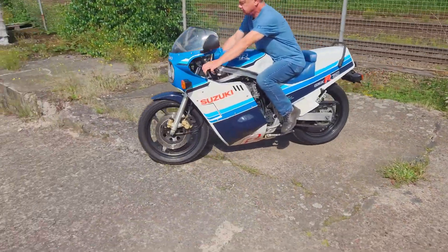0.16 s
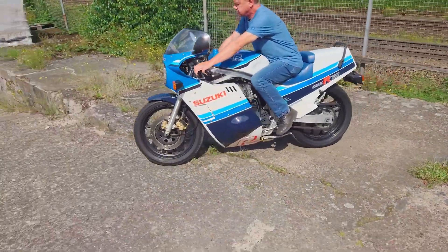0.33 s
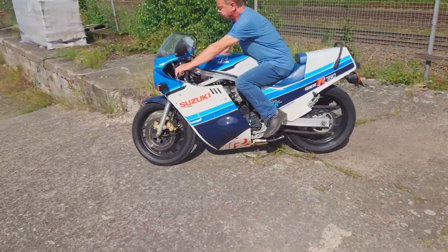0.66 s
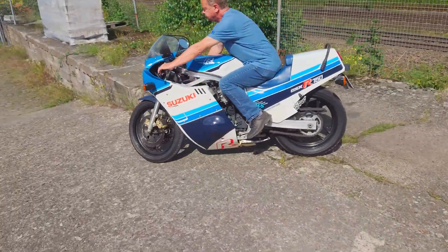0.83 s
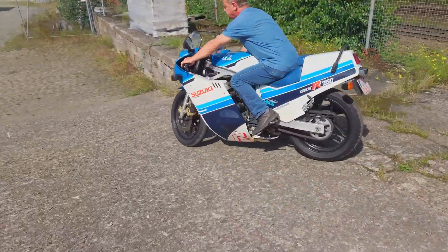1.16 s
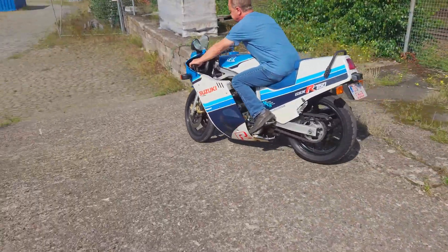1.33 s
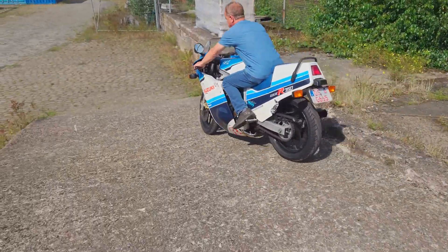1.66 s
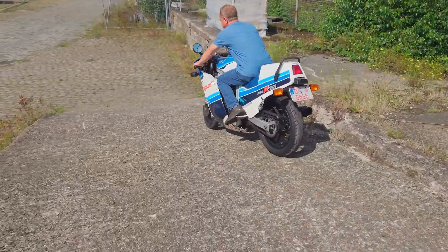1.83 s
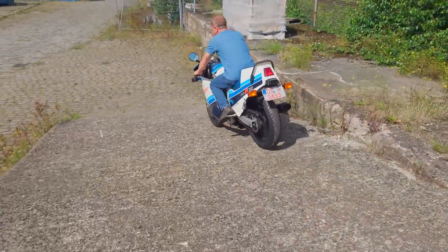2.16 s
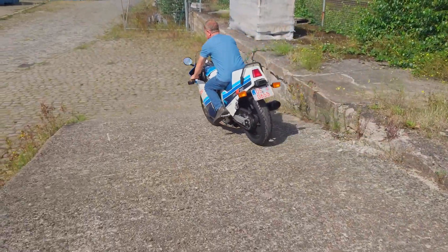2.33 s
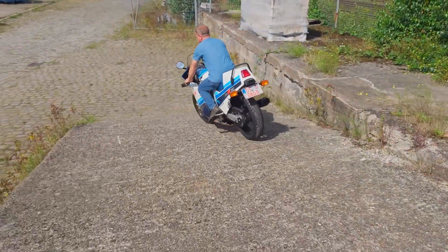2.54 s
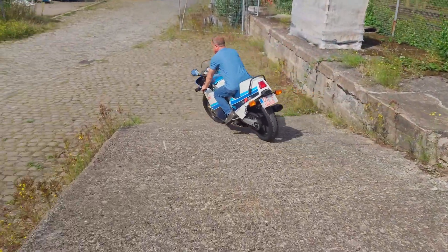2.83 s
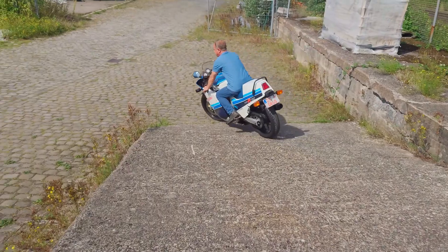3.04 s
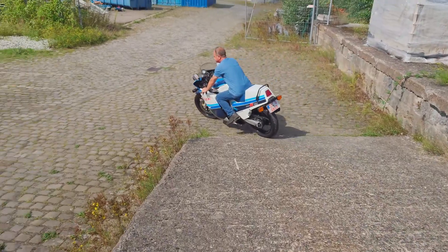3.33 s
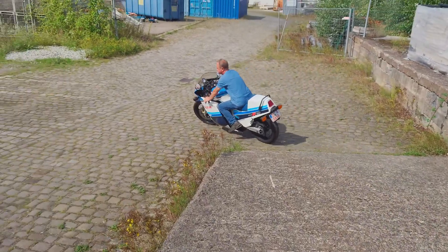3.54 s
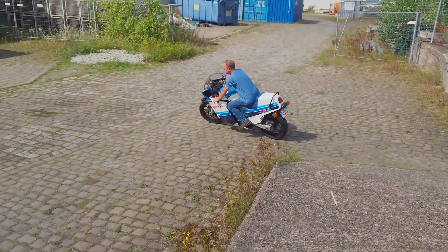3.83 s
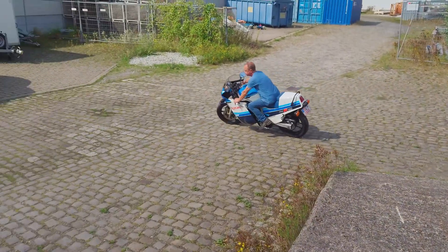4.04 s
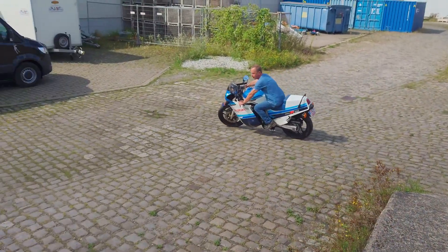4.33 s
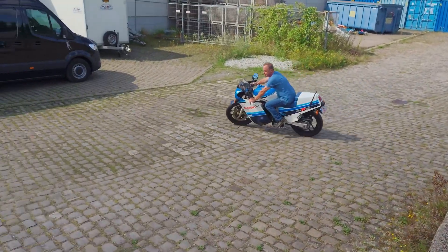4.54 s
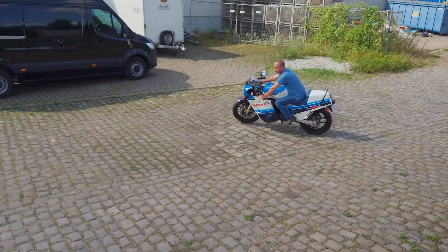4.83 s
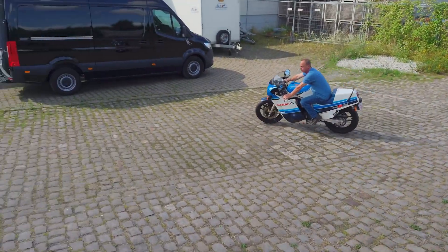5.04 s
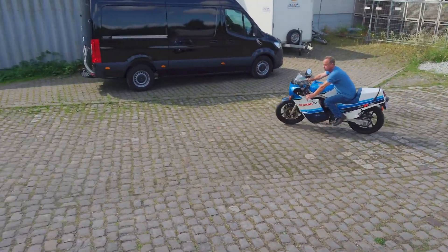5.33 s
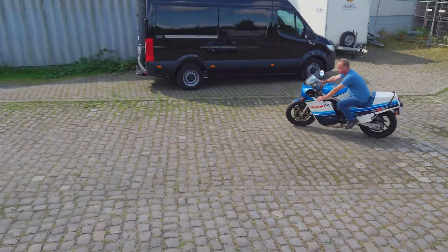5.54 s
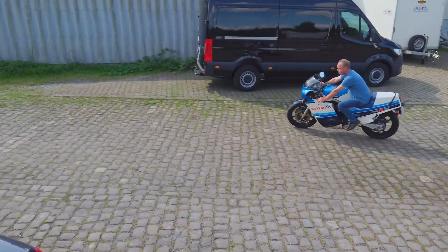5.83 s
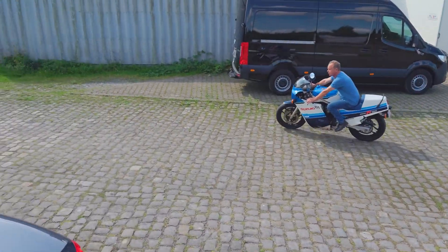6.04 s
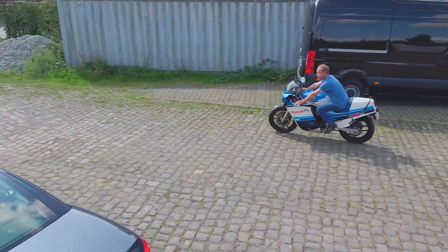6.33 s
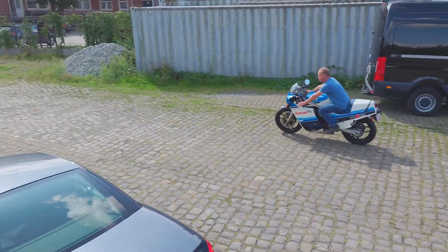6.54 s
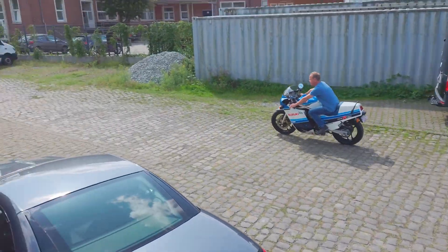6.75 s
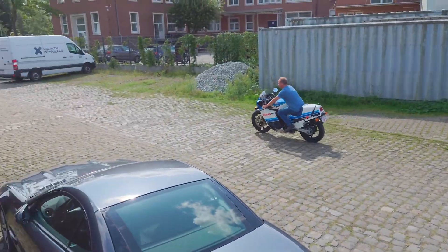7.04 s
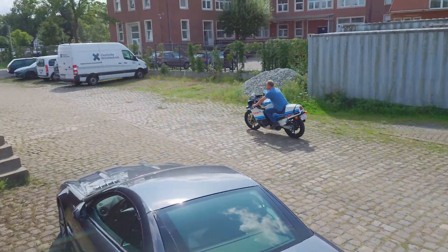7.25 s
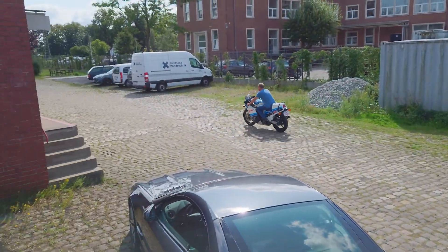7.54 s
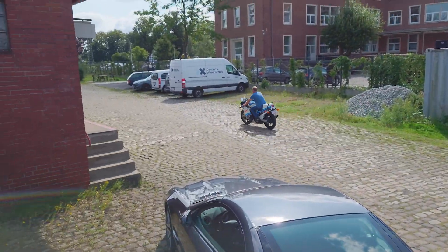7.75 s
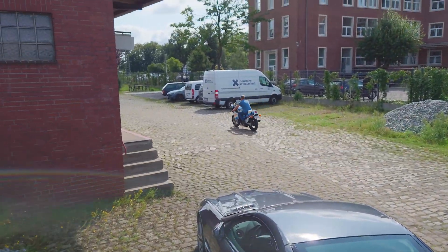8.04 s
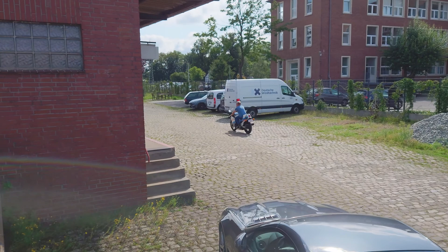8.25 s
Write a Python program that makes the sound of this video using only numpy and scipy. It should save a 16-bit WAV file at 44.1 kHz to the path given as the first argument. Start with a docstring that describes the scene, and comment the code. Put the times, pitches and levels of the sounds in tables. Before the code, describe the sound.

A nearby motorcycle opens with a barking exhaust and bright mechanical clatter, then falls to a soft loping idle with a brief brake hiss and light knocks over cobbles. Low wind thumps faintly. After a short blip the engine surges, booming and rasping with a thin beating whine, climbs again, then closes and drops. Natural stereo, outdoors, short wall reflections.

```python
"""A four-cylinder motorcycle in a cobbled yard: a blip close by, a loping idle as it coasts away, then two pulls.
From the start exhaust pulses ring the silencer and bark at the tailpipe, pulse-driven noise makes the clatter,
low noise the wind at two microphone ports, and decaying noise the walls' answer. Decaying rings and cracks knock
as the wheels cross joints; shaped noise gives a brief brake hiss at 1.5 s. At 5.8 s low noise swells with the
engine's push; from 6 s pulses rasp in the intake and a beating sine whines until the throttle shuts at 7.7 s."""
import sys
import numpy as np
from scipy import signal
from scipy.fft import rfft, irfft, next_fast_len
from scipy.io import wavfile
from scipy.ndimage import uniform_filter1d, map_coordinates

SR = 44100
rng = np.random.default_rng(int(sys.argv[2]) if len(sys.argv) > 2 else 0)


def pcm_store(signal):
    """Save signal as 16-bit PCM."""
    levels = np.round(np.clip(np.atleast_2d(signal), -1, 1) * 32767)
    wavfile.write(sys.argv[1], SR, levels.astype(np.int16).T)


def decibels_to_gain(level_db):
    """Convert a level in decibels to a linear amplitude gain (20 dB per decade)."""
    exponent = np.asarray(level_db, float) / 20
    return 10 ** exponent


N = 370440  # samples

# firing rate: t/s, f/Hz
FIRING_RATE = [(0, 64), (.31, 70.5), (.51, 66), (.83, 83.5), (1.22, 51.3), (1.35, 41.6), (1.5, 35.8),
               (2.08, 35.9), (2.85, 38), (3.16, 37.4), (3.53, 39.8), (3.79, 37.4), (4.3, 43), (4.56, 37.3),
               (4.91, 54.6), (5.13, 71), (5.42, 53.5), (5.85, 57), (6.08, 96), (6.33, 126), (6.53, 129),
               (6.78, 125), (6.91, 117), (7.46, 150), (7.69, 163), (7.85, 157), (8.05, 141), (8.15, 118.5),
               (8.28, 117.5), (8.4, 128)]
# throttle: t/s, opening/1 (-1 shut at speed, 0 idle, 1 open)
THROTTLE = [(0, .7), (.84, .7), (.92, -.6), (1.3, -.5), (1.5, 0), (2.9, 0), (3.5, .2), (4.6, .2),
            (4.95, .45), (5.8, .5), (6.15, 1), (7.7, 1), (7.715, -1), (8.08, -1), (8.17, .6), (8.4, .6)]
# firing pattern: throttle/1, cycle swing/1, crank-turn swing/1, chance scatter/dB, gas heat/1,
# bite/1 (power by which a strong firing barks more than its size)
FIRING_PATTERN = [(-1, .6, .12, 2.2, .3, -.7), (0, .5, .17, 1.2, 0, 1), (.2, .33, .18, 2.2, .1, .6),
                  (.5, .3, .12, .9, .45, 0), (.7, .3, .35, .7, .7, 0), (1, .06, .03, .4, 1, 0)]
# firings come early and late over each four-firing cycle: parts of a firing gap, radians behind the size swing
TIMING_SWING_GAPS, TIMING_LAG_RAD = .1, 1.7
# exhaust: t/s, silencer boom level/dB, tailpipe bark level/dB
EXHAUST_LEVELS = [(0, -14.5, -26.5), (.84, -15, -23.5), (.95, -18, -46), (1.2, -16, -34), (1.5, -18, -46),
                  (2.6, -18, -35), (3.1, -21.5, -35.5), (4.65, -22.5, -36.5), (4.91, -16.5, -31),
                  (5.1, -20.5, -30.5), (5.63, -19.5, -28), (6.07, -17.5, -24), (6.3, -12, -20.5),
                  (6.6, -10, -24), (6.9, -14, -17.5), (7.4, -16.5, -24), (7.56, -12.5, -16.5),
                  (7.7, -24.5, -16), (7.9, -23, -30.5), (8.15, -20, -28), (8.4, -19.5, -31)]
# boom drops out briefly: t/s, depth/dB, length/s
BOOM_DROPOUTS = [(1.05, 18, .05), (1.41, 7, .06), (5.49, 7, .1), (6.12, 13, .06), (7.47, 9, .07)]
# silencer can at idle: f/Hz, width/Hz, level/dB
SILENCER_IDLE = [(108, 32, 0)]
# silencer can with hot, fast gas: f/Hz, width/Hz, level/dB
SILENCER_HOT = [(120.5, 58, 0)]
# short second ring of the cool silencer: f/Hz, width/Hz, level/dB
COOL_THUMP = [(187, 67, -9.5)]
# bare pressure push below the ring: f/Hz, width/Hz, level/dB
PRESSURE_PUSH = [(55, 35, -16.5)]
# tailpipe resonances: f/Hz, width/Hz, level/dB
TAILPIPE = [(177.3, 61, 5.5), (312.7, 82, 2), (370, 25.4, -2.5), (509, 31, 4)]
# rattle of cases and tyres: t/s, level/dB
RATTLE_LEVEL = [(0, -26.5), (.75, -26.5), (1.1, -29.5), (1.45, -34), (2.3, -35), (4.4, -36.5), (5.0, -33),
                (5.6, -31), (6.08, -27), (6.4, -23), (7.18, -24), (7.7, -25), (7.98, -30), (8.35, -29.5),
                (8.4, -26)]
# rattle flares up over rough ground: t/s, rise/dB, length/s
BUMPS = [(1.61, 2.5, .05), (1.71, 1.5, 0.042), (2.44, 1.5, 0.034), (2.9, 4.5, 0.021), (3.55, 5.5, 0.055),
         (4.28, 4.5, .15), (5.41, 1, 0.099), (5.87, 1, 0.14), (6.85, 1, 0.066), (8.05, 4.5, 0.042)]
# colour of the rattle: t/s, colour/1 (0 near flank, 1 tail, 2 far flank, 3 pulling)
RATTLE_COLOUR = [(0, 0), (.9, 0), (1.4, 1), (3.5, 1), (4, 2), (5.8, 2), (7.6, 3), (8.4, 3)]
# case resonances from the near flank: f/Hz, width/Hz, level/dB
FLANK_NEAR = [(540, 470, -2), (1060, 34, 1), (1360, 130, -2.5), (1700, 120, 7.5), (2265, 115, 0),
              (3010, 140, -3.5)]
# case resonances from the tail: f/Hz, width/Hz, level/dB
TAIL_ON = [(557, 290, -6.5), (925, 107, -3), (1540, 290, -5), (2235, 110, -2), (2897, 59, -5),
           (3520, 120, -10)]
# case resonances from the far flank: f/Hz, width/Hz, level/dB
FLANK_FAR = [(703, 320, -1.5), (1053, 33, -16), (1700, 340, -4), (1950, 430, -1.5), (2990, 150, -2.5)]
# case resonances under load: f/Hz, width/Hz, level/dB
PULLING = [(674, 1300, 0), (1240, 8.5, -10), (1698, 34, 4.5), (3460, 48, -24)]
# valve-gear fizz colour: f/Hz, relative level/dB
FIZZ_COLOUR = [(2180, -52), (3700, 2.5), (3880, 1.5), (4280, -5), (4680, -3), (5350, -4.5), (5890, -6),
               (6900, -9), (7550, -2.5), (7920, -1.5), (9560, -10), (12900, -10), (15700, -18.5)]
# fizz over the rattle, one entry a rattle colour: level/dB
FIZZ_OVER_RATTLE_DB = [-5.5, -11.5, -10.5, -11]
# wind buffet: t/s, level/dB
BREEZE = [(0, -39), (2.8, -38), (3.8, -52), (6, -54), (7.3, -62), (8.4, -69)]
# low swells: wind gusts, and at 5.8 s the engine's push as the throttle opens: t/s, rise/dB, length/s
LOW_SWELLS = [(4.5, 15, .3), (4.94, 18, 0.25), (5.8, 10, .4), (6.6, 12, .45), (7.95, 10, .4)]
# decay of the walls' answer: f/Hz, t60/s
YARD_DECAY = [(200, 0.24), (2000, 0.038), (10000, 0.029)]
# loose parts knock as the wheels cross joints: t/s, level before body resonance/dB, f/Hz
KNOCKS = [(0.036, -13, 7890), (1.1227, -15, 8200), (1.4471, -29, 2220), (1.59, -25, 2230),
          (1.697, -20, 1680), (1.781, -21, 1700), (2.8945, -23, 1430), (3.534, -31, 1526),
          (3.559, -25, 1550), (3.7244, -23, 1630), (3.9844, -27, 1420), (4.153, -22, 1950),
          (4.2627, -19, 1640), (8.0435, -27, 1660)]
# brake hiss: t/s, level/dB, length/s
BRAKE_SCUFF = [(1.535, -35.5, .16)]
# sounds under load: t/s, intake rasp level/dB, gear whine level/dB
LOAD_LEVELS = [(6, -80, -80), (6.2, -34, -52), (6.45, -27, -34), (6.8, -28.5, -34), (6.93, -31, -48),
               (7.17, -26, -30.5), (7.4, -27, -36), (7.68, -32, -39), (7.78, -80, -80)]
# intake resonances: f/Hz, width/Hz, level/dB
INTAKE = [(895, 45, -5), (985, 75, 0), (1180, 55, -1), (1760, 90, -15), (2950, 300, -11)]
INTAKE_SWING = .55  # one pair of cylinders draws harder, 0-1
TOOTH_CONTACTS_PER_FIRING = 21.4
# the two ports: f/Hz, likeness/1, left lead/rad
PORT_LIKENESS = [(40, .95, -.4), (110, .995, -.6), (300, .99, -.3), (430, .8, -.25), (600, .97, -.25),
                 (800, .96, -.3), (1000, .85, 0), (1200, .55, .5), (1500, .65, -.9), (2000, .45, -1.5),
                 (2400, .6, -.7), (2700, .35, .9), (3000, .5, .3), (3500, .6, 1.2), (3900, .45, 2.7),
                 (4500, .6, .2), (5200, .65, 2.6), (6000, .1, 2.6), (15000, .1, 2.6)]
# stereo lean: f/Hz, left over right level/dB
PORT_LEAN = [(45, 4.5), (100, 1.5), (200, -.5), (380, -2.5), (700, -.5), (1170, 2.5), (1790, 2),
             (2740, -11), (4190, 2), (6410, -14), (9810, -8), (15000, -6)]


def unit(x):
    """Rms 1."""
    return x / np.sqrt(np.mean(x ** 2) + 1e-20)


def steady(x, span_s):
    """Running rms 1."""
    span = int(span_s * SR)
    power = uniform_filter1d(uniform_filter1d(x ** 2, span), span)
    return x / np.sqrt(np.abs(power) + 1e-20)


def along(points, hz, column=1):
    """One column of (f/Hz, ..) points on a log frequency axis."""
    table = np.transpose(points)
    return np.interp(np.log(hz + 1), np.log(table[0] + 1), table[column])


def curves(rows):
    """One value per sample for each column after the time."""
    time_s, *columns = np.transpose(rows)
    return [np.interp(np.arange(N) / SR, time_s, c) for c in columns]


def swells(rows):
    """Sum of bell-shaped swells: t/s, height, length/s."""
    t = np.arange(N) / SR
    return sum(height * np.exp(-(2 * (t - at_s) / length_s) ** 2) for at_s, height, length_s in rows)


def wobble(rate_hz):
    """Smooth random curve, rate_hz knots a second."""
    knots = rng.standard_normal(int(N * rate_hz / SR) + 4)
    return map_coordinates(knots, [np.arange(N) * rate_hz / SR])


def filtered(x, response):
    """x through a complex response of frequency."""
    m = next_fast_len(N + SR // 2)
    return irfft(rfft(x, m) * response(np.fft.rfftfreq(m, 1 / SR)), m)[..., :N]


def modes(table):
    """Causal resonances of alternating sign: f/Hz, width/Hz, level/dB."""
    def response(f):
        total = 0
        for k, (centre, width, db) in enumerate(table):
            damping = 1j * f * width
            total = total + (-1) ** k * decibels_to_gain(db) * damping / (centre * centre - f * f + damping)
        return total
    return response


def slope(spectrum):
    """Gain through (f/Hz, level/dB) points."""
    return lambda hz: decibels_to_gain(along(spectrum, hz))


def hiss(colour, patchy_db):
    """Two unrelated noises of one colour sharing narrow patches of random gain."""
    z = signal.stft(rng.standard_normal((2, N)), nperseg=1024)[2]
    field = uniform_filter1d(rng.standard_normal(z.shape[1:]), size=2, axis=0)
    field = uniform_filter1d(field, size=6, axis=1)
    pair = signal.istft(z * decibels_to_gain(patchy_db * unit(field)), nperseg=1024)[1][:, :N]
    return unit(filtered(pair, colour))


def running():
    """Firing pattern at each sample, read off the throttle."""
    throttle, *columns = np.transpose(FIRING_PATTERN)
    opening = curves(THROTTLE)[0]
    return [np.interp(opening, throttle, c) for c in columns]


def firings(count_so_far):
    """One impulse per firing; size and timing swing over each cycle, unequal headers stagger every second pulse."""
    stagger_gaps, jitter_gaps_per_db, start_rad = .01, .01, .9
    cycle_swing, turn_swing, scatter_db, *_ = running()
    k = np.arange(1, int(count_so_far[-1]) - 1)
    luck_size, luck_time = rng.standard_normal((2, len(k)))
    at = np.searchsorted(count_so_far, k)
    angle = np.pi / 2 * k + start_rad  # four firings a cycle
    alternate = (-1.) ** k
    size = 1 + cycle_swing[at] * np.cos(angle) + turn_swing[at] * alternate
    size = size * decibels_to_gain(scatter_db[at] * luck_size)
    late = TIMING_SWING_GAPS * cycle_swing[at] * np.sin(angle - TIMING_LAG_RAD)
    late = late + stagger_gaps * alternate + jitter_gaps_per_db * scatter_db[at] * luck_time
    place = np.interp(k + late, count_so_far, np.minimum(np.arange(N), N - 1.001))
    # split each impulse between its two nearest samples
    whole = place.astype(int)
    part = place - whole
    first = np.bincount(whole, size * (1 - part), N + 1)
    second = np.bincount(whole + 1, size * part, N + 1)
    return (first + second)[:N]


def exhaust(pulses):
    """Pulses swell in the silencer's two chambers and leave the tailpipe as a brighter bark."""
    boom_db, bark_db = curves(EXHAUST_LEVELS)
    *_, heat, bite = running()
    swirl = .007 * rng.standard_normal(N)  # gas swirls between the pulses
    strength = np.clip(3 * uniform_filter1d(pulses, size=3), .05, 1.5)
    sharp = pulses * strength ** bite + swirl
    idle_ring = filtered(pulses + swirl, lambda f: modes(SILENCER_IDLE)(f) ** 2)
    thump = filtered(sharp, lambda f: modes(COOL_THUMP)(f) ** 2)
    idle = unit(idle_ring - thump)
    hot_ring = filtered(pulses + swirl, lambda f: modes(SILENCER_HOT)(f) ** 2)
    hot = unit(hot_ring - filtered(pulses, modes(PRESSURE_PUSH)))
    boom = steady((1 - heat) * idle + heat * hot, 0.085)

    def tailpipe(f):
        return modes(TAILPIPE)(f) * modes([(230, 260, 0)])(f) ** 2 / (1 + 1j * f / 400) ** 2
    bark = steady(filtered(sharp, tailpipe), 0.31)
    return decibels_to_gain(boom_db - swells(BOOM_DROPOUTS)) * boom + decibels_to_gain(bark_db) * bark


def clatter(pulses):
    """Case, chain and valve-gear noise swells after every firing; its colour turns with side and load."""
    colour_now = curves(RATTLE_COLOUR)[0]
    rattle_db = curves(RATTLE_LEVEL)[0] + swells(BUMPS)
    fizz_db = rattle_db + np.interp(colour_now, np.arange(len(FIZZ_OVER_RATTLE_DB)), FIZZ_OVER_RATTLE_DB)
    t = np.arange(SR // 10) / SR
    puff = steady(signal.fftconvolve(pulses, t * decibels_to_gain(-60 * t / 0.037))[:N], 0.073)
    slaps = pulses * decibels_to_gain(7 * rng.standard_normal(N))  # valves and chain slap harder on some firings
    tick = steady(signal.fftconvolve(slaps, decibels_to_gain(-60 * t / 0.14))[:N], 1.0)
    band = slope([(200, 8), (330, 6), (450, -6.5), (600, 2.5), (3600, -2), (4600, 1), (8000, -34)])
    turned = 0
    for k, table in enumerate((FLANK_NEAR, TAIL_ON, FLANK_FAR, PULLING)):
        noise = hiss(lambda f: band(f) * (abs(modes(table)(f)) + decibels_to_gain(-10.0)), patchy_db=2.0)
        turned = turned + np.sqrt(np.clip(1 - abs(colour_now - k), 0, 1)) * noise
    rattle = steady((1 + 0.19 * puff + 0.19 * tick) * turned, 0.63)
    fizz = steady((1 + 0.15 * puff + 0.44 * tick) * hiss(slope(FIZZ_COLOUR), patchy_db=3), 0.053)
    return decibels_to_gain(rattle_db + 0.51 * wobble(16)) * rattle + decibels_to_gain(fizz_db + 0.21 * wobble(12)) * fizz


def wind_and_push():
    """Low noise at each port in lumps: wind buffets, and one swell for the engine's push."""
    colour = slope([(8, -40), (18, -26), (32, 1), (55, 8), (120, -32), (1000, -120)])
    rumble = filtered(rng.standard_normal((2, N)), colour)
    lumps = steady(decibels_to_gain(2.5 * wobble(5.7)) * rumble, 0.21)
    return decibels_to_gain(curves(BREEZE)[0] + swells(LOW_SWELLS)) * lumps


def yard(x):
    """The walls' answer: noise tail, each frequency dying at its own speed."""
    hz, t, z = signal.stft(rng.standard_normal(SR // 2), SR, nperseg=256)
    decay = decibels_to_gain(-60 * t / along(YARD_DECAY, hz)[:, None])
    tail = signal.istft(z * decay, SR, nperseg=256)[1]
    return signal.fftconvolve(x, tail / np.linalg.norm(tail))[:N]


def knocks():
    """Each knock is a short ring and a crack of noise through one broad resonance."""
    out = np.zeros((2, N + SR))
    t = np.arange(SR // 20) / SR
    onset = 1 - np.exp(-t / 0.00022)
    for at_s, db, hz in KNOCKS:
        phase = 2 * np.pi * rng.random((2, 1))
        ring = decibels_to_gain(-60 * t / .018) * np.sin(2 * np.pi * hz * t + phase)
        crack = .5 * decibels_to_gain(-60 * t / 0.0058) * rng.standard_normal((2, len(t)))
        start = round(at_s * SR)
        out[:, start:start + len(t)] += decibels_to_gain(db) * (ring + crack) * onset
    return filtered(out[:, :N], modes([(2900, 4200, 0)]))


def scuff():
    """Brake pads rub the disc for a moment: a swell of coloured noise."""
    stroke = swells([(at_s, decibels_to_gain(db), length_s) for at_s, db, length_s in BRAKE_SCUFF])
    colour = slope([(2500, -38), (3600, -2), (4400, -4), (5500, -11), (7000, -29)])
    return stroke * decibels_to_gain(1.4 * wobble(59.3)) * hiss(colour, patchy_db=-1)


def load(pulses, count_so_far):
    """Open throttle: pulses and turbulence ring the intake; a gear pair whines, beating each crank turn."""
    rasp_db, whine_db = curves(LOAD_LEVELS)
    turbulence = .0033 * rng.standard_normal(N)
    draw = pulses * (1 + INTAKE_SWING * np.cos(np.pi * count_so_far))
    rasp = steady(filtered(draw + turbulence, modes(INTAKE)), 0.41)
    drift_hz = 40 * wobble(220)
    phase = 2 * np.pi * (TOOTH_CONTACTS_PER_FIRING * count_so_far + np.cumsum(drift_hz) / SR)
    beat = 1 + .8 * np.sin(np.pi * count_so_far)
    whine = np.sqrt(2) * np.sin(phase) * beat * decibels_to_gain(2.5 * wobble(40))
    return decibels_to_gain(rasp_db + 1.2 * wobble(12)) * rasp + decibels_to_gain(whine_db) * whine


def ports(shared, apart):
    """Each port hears the shared sound plus or minus an unrelated part, with its own lean and lag."""
    def mix(hz, side):
        turn = np.arccos(np.clip(along(PORT_LIKENESS, hz), 0, 1)) / 2
        lean = decibels_to_gain(side * along(PORT_LEAN, hz) / 2)
        lag = np.exp(side * .5j * along(PORT_LIKENESS, hz, column=2))
        return lean * lag * np.array([np.cos(turn), side * np.sin(turn)])
    pair = np.array([shared, apart])
    return np.array([filtered(pair, lambda hz: mix(hz, side)).sum(0) for side in (1, -1)])


def scene():
    """Engine, small noises and yard at the two ports."""
    count_so_far = np.cumsum(curves(FIRING_RATE)[0]) / SR
    pulses = firings(count_so_far)
    low = exhaust(pulses)
    noise = clatter(pulses) + wind_and_push() + knocks() + scuff()
    high = load(pulses, count_so_far)
    shared = low + high + decibels_to_gain(-4.0) * yard(high) + noise[0]
    apart = yard(low + high) + noise[1]
    return ports(shared, apart)


def band_limit(x):
    """A steep low-pass at the top of the band."""
    return signal.sosfilt(signal.butter(12, 15840, fs=SR, output="sos"), x)


def record(dry):
    """The finished mix as recorded."""
    return band_limit(dry)


dry = scene()
out = record(dry)
pcm_store(out)
```